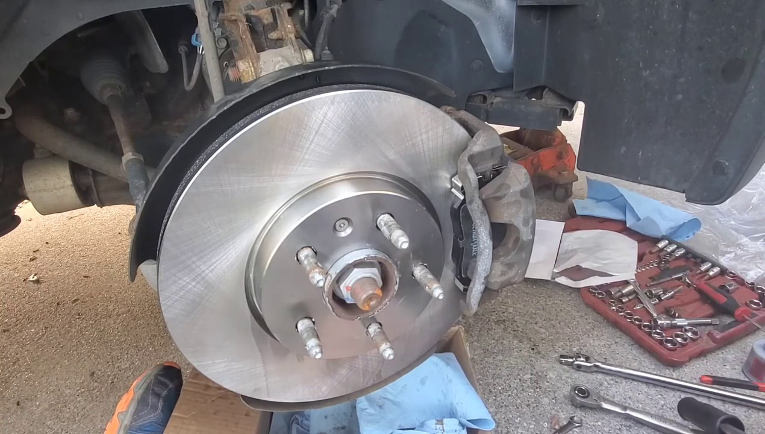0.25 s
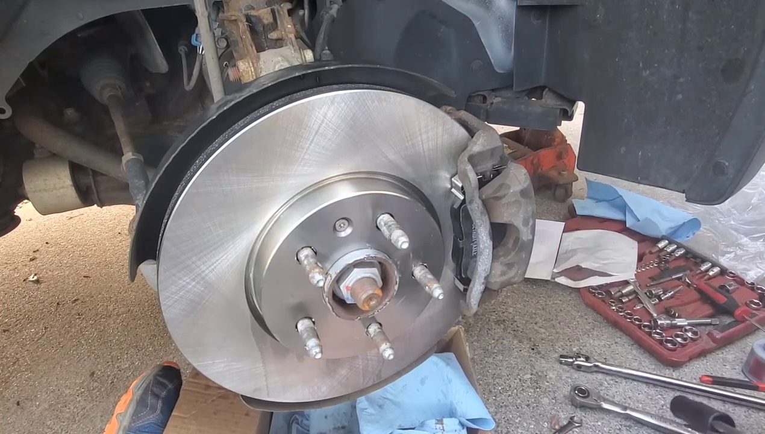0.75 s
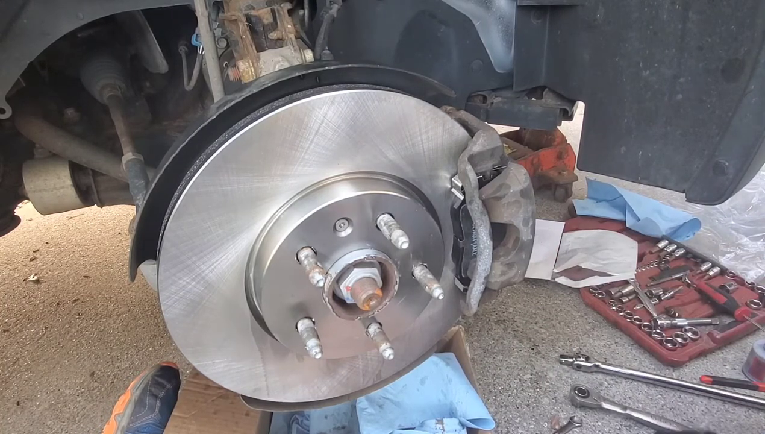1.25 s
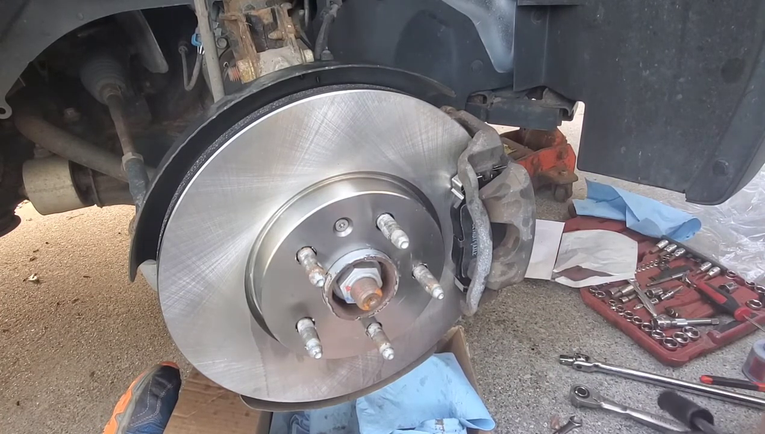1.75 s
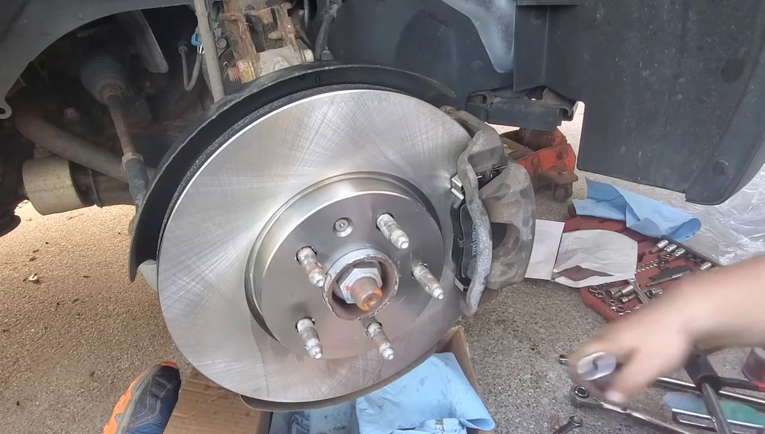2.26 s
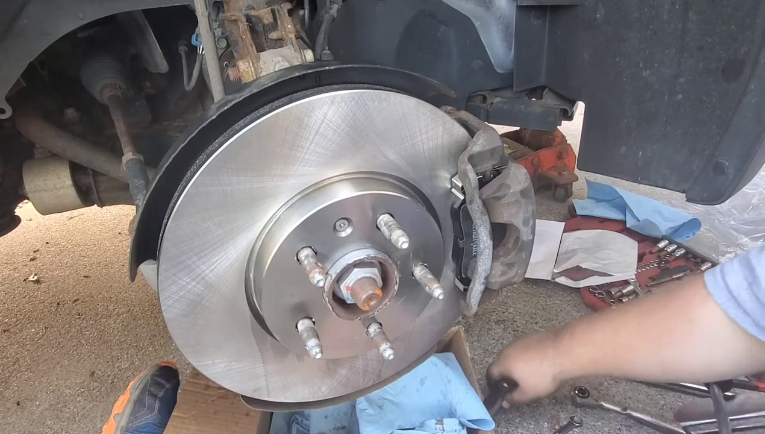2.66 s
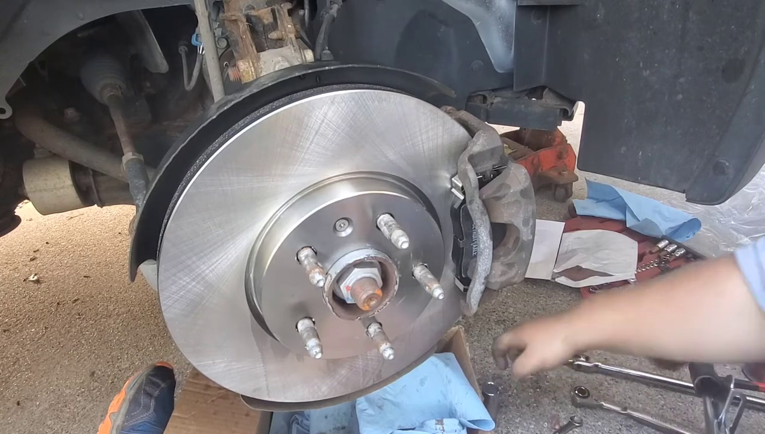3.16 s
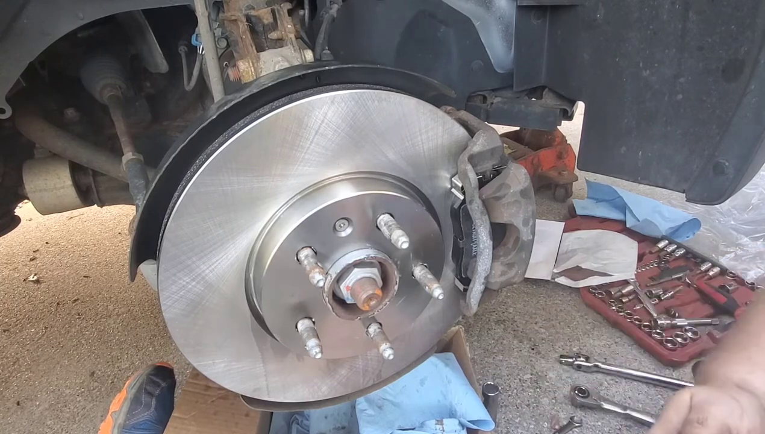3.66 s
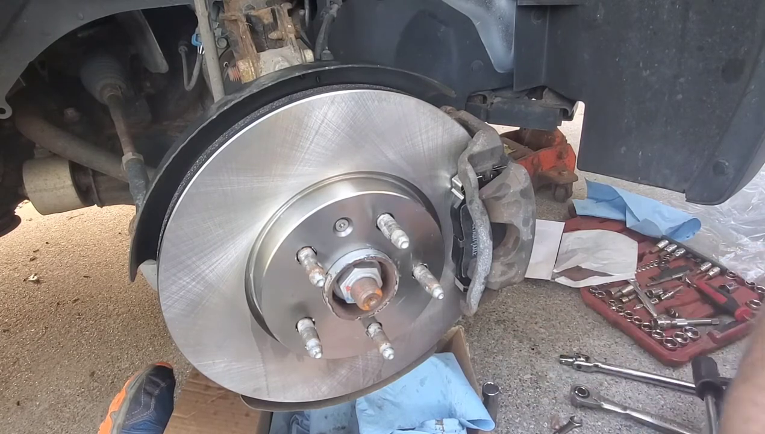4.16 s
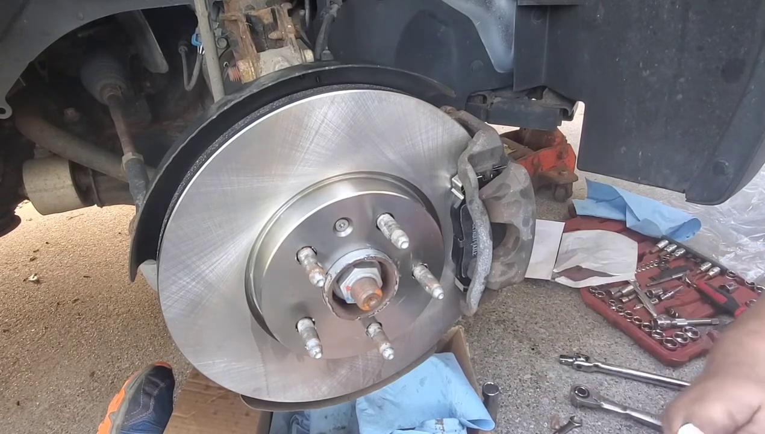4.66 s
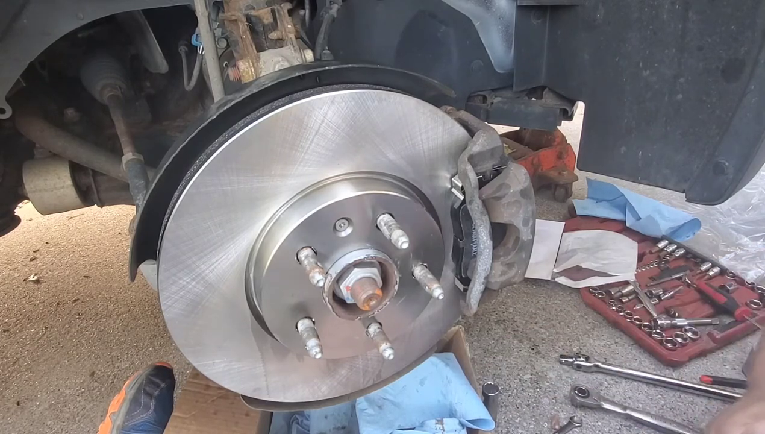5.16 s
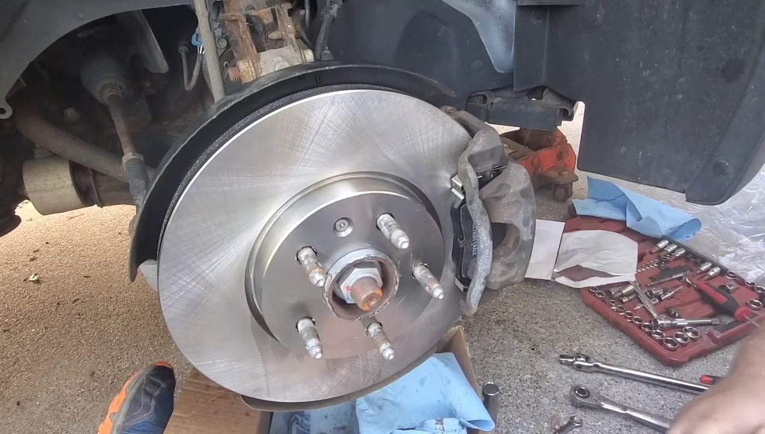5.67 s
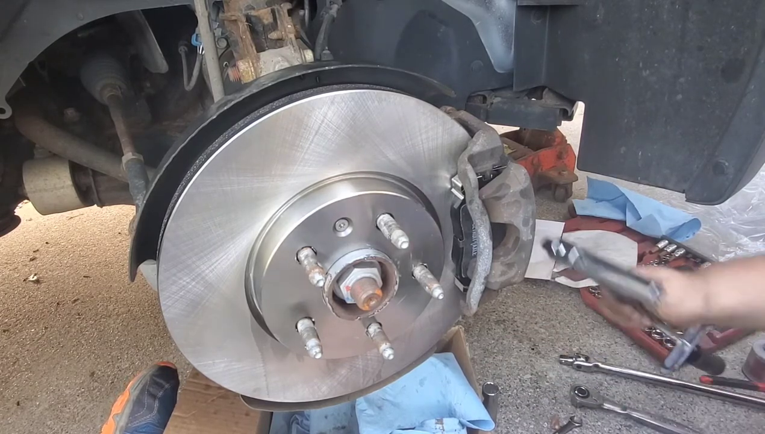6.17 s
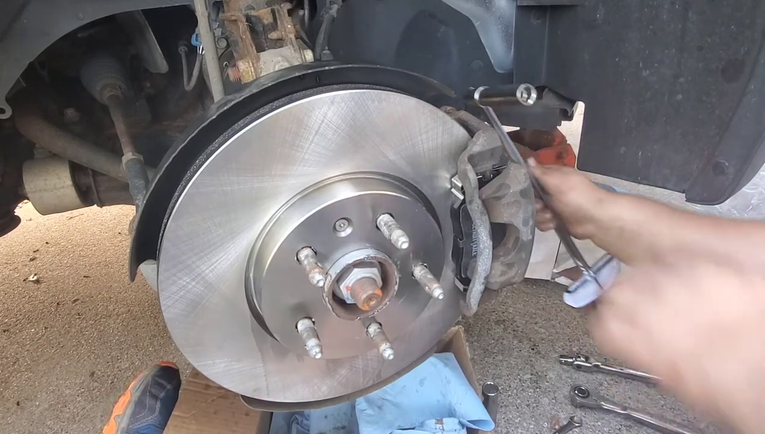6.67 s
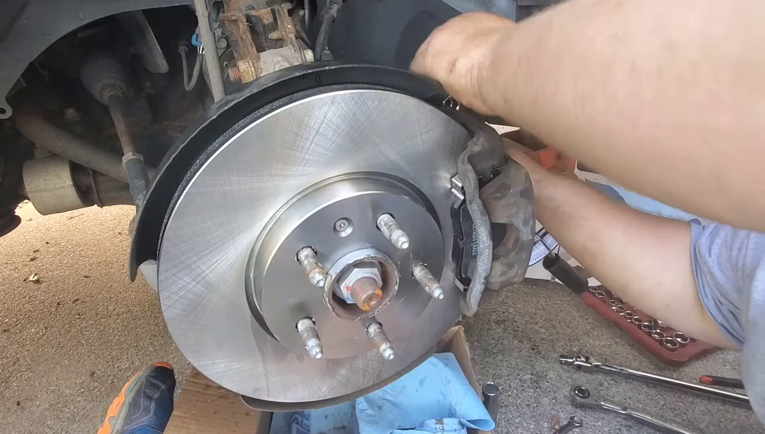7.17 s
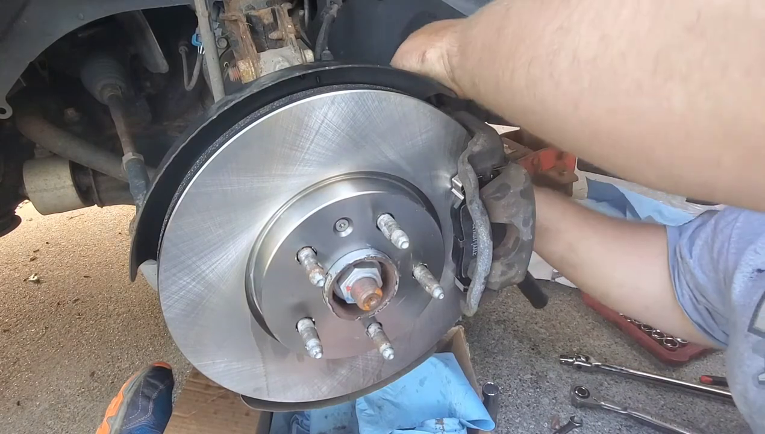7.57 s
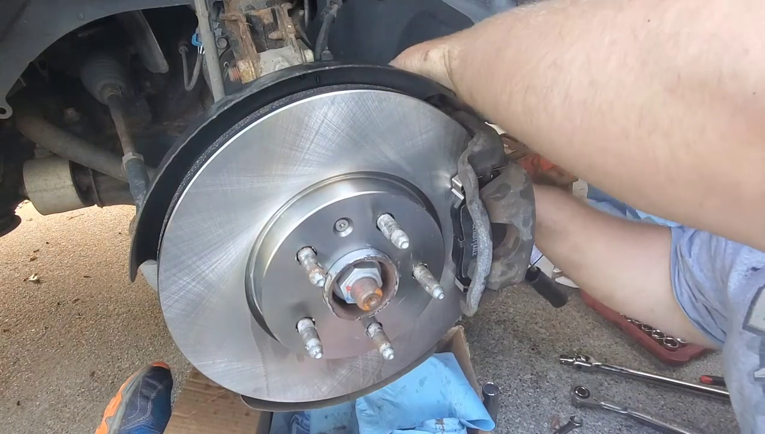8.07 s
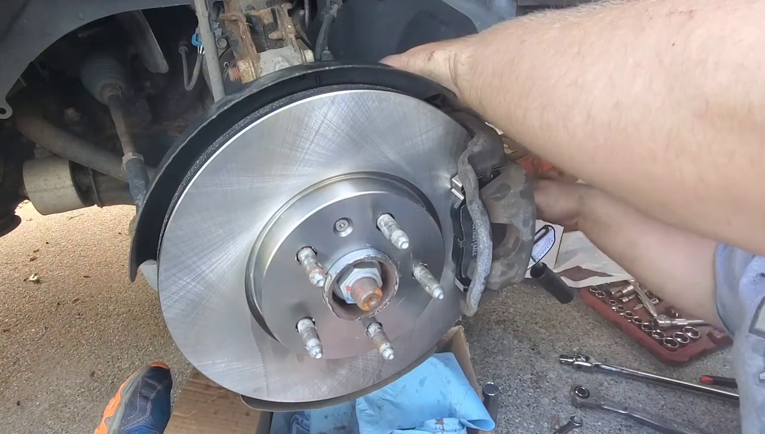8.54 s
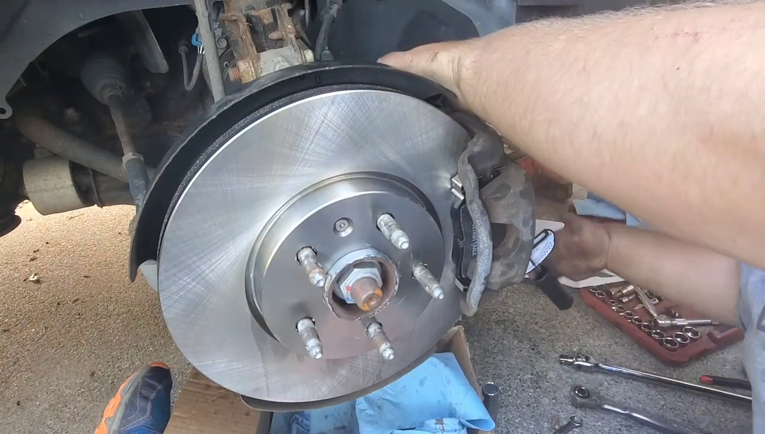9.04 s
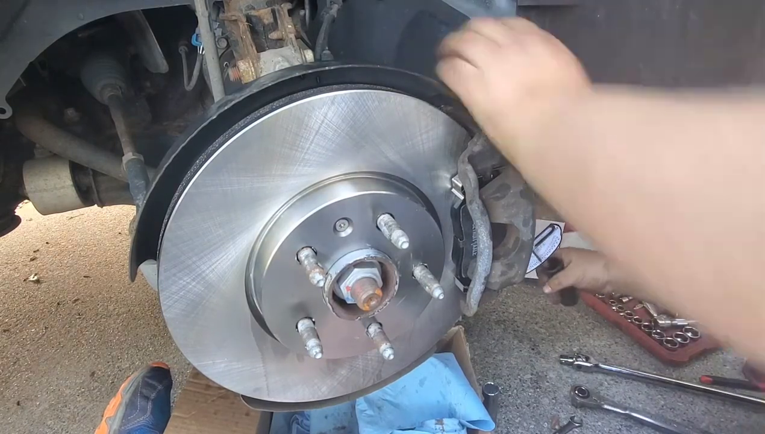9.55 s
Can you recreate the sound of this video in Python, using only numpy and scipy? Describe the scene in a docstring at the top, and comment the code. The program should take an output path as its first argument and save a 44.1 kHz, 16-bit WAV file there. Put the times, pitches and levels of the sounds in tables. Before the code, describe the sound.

Metal hand tools clink and clatter on hard ground outdoors, later tapping and scraping a brake hub, with soft low rumble and faint hiss behind.

```python
"""Sockets and a ratchet on a concrete drive

Steel sockets and a ratchet handle knock and chatter on the ground, then touch and scrape a car's hub.
Each knock is a crack and a short chatter of noise and bounces that ring the tools as decaying sines;
scrapes are gritty noise and taps are the ringing modes of the hub and its shield, all with a short echo.
Behind them shaped noise makes a low rumble, road wash, narrow hums, rustling cloth and air hiss.
Two microphone ports hear the tools a little apart."""
import sys
import numpy as np
from scipy import signal
from scipy.fft import irfft
from scipy.io import wavfile
from scipy.ndimage import uniform_filter1d

SR = 44100
rng = np.random.default_rng(int(sys.argv[2]) if len(sys.argv) > 2 else 0)


def wrap_up_sound(samples):
    """Save the sound to the file named by the first command line argument, as 16-bit audio."""
    columns = np.atleast_2d(samples).T
    # keep every value between -1 and 1, then stretch to whole-number steps
    tamed = np.clip(columns, -1, 1)
    steps = np.round(tamed * 32767).astype(np.int16)
    wavfile.write(sys.argv[1], SR, steps)


N = 432599
FREQ = np.maximum(np.fft.rfftfreq(N, 1 / SR), 1)

TREBLE_END_HZ = 15650
KNOCK_LIKENESS = 0.067  # left-right correlation of the contact noise

# Hub mode frequencies [Hz]
HUB_MODES_HZ = 813, 750, 931, 1217, 1450, 1981, 2126, 2320, 2396, 2487, 2780, 2907, 3391, 3790, 4097, 4603
# How each hub mode rings: level_db [dB, relative], t60_s [s]
HUB_MODES = [(2.5, 0.37), (-7, 0.6), (-0.5, 0.13), (-1.5, 0.12), (-23, 0.33), (-26, 0.25), (-12.5, 0.34),
             (7, 0.15), (-2.5, 0.16), (-7, 0.25), (-9, 0.19), (4.5, 0.14), (-5.5, 0.17), (3, 0.13),
             (-3, 0.037), (-7.5, 0.19)]


def undb(db):
    """Decibels to amplitude gain."""
    return 10 ** (np.asarray(db) / 20)


def along(table, hz=FREQ):
    """Read (Hz, value) points on a log frequency axis."""
    at, value = np.transpose(table)
    return np.interp(np.log(hz), np.log(at), value)


def band(x, lo_hz, hi_hz):
    """Band-pass that keeps white noise at its rms."""
    sos = signal.butter(4, [lo_hz, hi_hz], "bandpass", fs=SR, output="sos")
    return signal.sosfilt(sos, x) * np.sqrt(SR / 2 / (hi_hz - lo_hz))


def walk(rate_hz):
    """Random levels, each held 1 / rate_hz seconds, then smoothed twice over the same length."""
    hold = int(SR / rate_hz)
    steps = np.repeat(rng.standard_normal(N // hold + 1), hold)
    return uniform_filter1d(uniform_filter1d(steps, hold), hold)[:N]


def pair(shape, like):
    """Two noises, left and right, with correlation `like`."""
    left, other = rng.standard_normal((2,) + shape)
    return np.array([left, like * left + np.sqrt(1 - like ** 2) * other])


def knocks():
    """A crack, then chatter: broadband clatter, a ping of the piece itself and blows into each tool."""
    # Every knock: start_s [s]; clatter thud_db, clack_db, chink_db, treble_db [dB, relative];
    # t60_s [s], free_s [s until muffled], pan_db [dB, left minus right],
    # rings {tool: blow_db [dB], ping: (pitch_hz [Hz], level_db [dB])}
    blows = [(0.5142, -67, -53, -55, -66, .11, .08, -1, dict()),
             (0.757, -48, -39.5, -38, -29.5, 0.047, .08, 0.5, dict(ping=(11800, -37.5))),
             (0.9651, -37, -25, -35.5, -36, 0.059, .08, -2, dict(ping=(3050, -40))),
             (1.2848, -24, -17.5, -14.5, -21, 0.17, .12, -1, dict(bar=-37, head=-22, wide=-21, long=-21.5, deep=-23.5, small=-33, ping=(15300, -14))),
             (1.4066, -24.5, -37.5, -49, -50, 0.04, .089, -1.5, dict(ping=(1300, -52))),
             (1.858, -45, -50, -39.5, -46, .23, .074, -1, dict(head=-53, ping=(4060, -39))),
             (1.9, -37, -26, -15, -27, 0.13, 0.13, 6, dict(head=-28.5, wide=-27, long=-40, deep=-33.5)),
             (1.9065, -33, -47, -20, -15.5, 0.096, .11, -4.5, dict(bar=-37.5, head=-29, wide=-27, long=-22.5, deep=-29.5, small=-37)),
             (2.0428, -24, -9, -23, -32, 0.03, 0.04, 0.5, dict(bar=-40, small=-13, extension=-45)),
             (2.3314, -71, -59, -34, -39, 0.095, .08, -6, dict(head=-47, ping=(4600, -48))),
             (2.4074, -55, -42, -56, -54, 0.12, .08, 3, dict(ping=(1530, -41.5))),
             (2.9197, -34, -54, -53, -72, 0.14, 0.053, 2, dict(ping=(500, -43.5))),
             (3.1894, -41.5, -68, -57, -66, 0.087, .08, 4, dict()),
             (3.289, -60, -65, -66, -71, .091, .08, 3, dict()),
             (4.165, -37, -17, -13, -26, 0.11, 0.04, 2, dict(bar=-35.5, head=-18, wide=-18, long=-31, deep=-44, extension=-24)),
             (4.1755, -31.5, -26.5, -28, -25, 0.14, 0.14, -1, dict(bar=-29.5, head=-15.5, wide=-20, long=-23.5, extension=-29)),
             (4.2717, -45, -33, -38.5, -44, 0.16, 0.063, -2.5, dict(bar=-42.5, head=-39, wide=-27, extension=-40.5)),
             (4.8854, -35, -25, -20.5, -38.5, .13, 0.059, 0, dict(bar=-46, head=-36, wide=-22, long=-29.5, deep=-46)),
             (4.9084, -37, -24, -37, -55, 0.044, 0.046, 1.5, dict(head=-55, wide=-26)),
             (4.9452, -40, -27.5, -26, -56, 0.086, 0.015, -3, dict(wide=-21.5, long=-34)),
             (5.007, -34, -32, -25, -50, 0.068, 0.025, -0.5, dict(head=-37, wide=-30, long=-36)),
             (5.0443, -36, -39, -40, -54, 0.09, .08, 0, dict(ping=(4300, -35))),
             (5.0791, -51, -47, -36, -36, 0.061, .08, -3, dict()),
             (5.236, -29, -31, -22, -38, 0.039, 0.024, -2, dict(wide=-30.5)),
             (5.2482, -32, -46, -46, -61, 0.069, .08, 5, dict(ping=(1800, -48))),
             (5.4033, -33, -31, -28, -30, 0.2, 0.067, -13, dict(ping=(15000, -22))),
             (5.4114, -17, -19.5, -17, -18, 0.098, .13, 3, dict(head=-40, ping=(14600, -25))),
             (5.5784, -45, -54, -42, -48, 0.08, 0.055, -2, dict(ping=(4210, -46))),
             (5.7747, -47, -43.5, -43, -38.5, 0.097, .08, 1.5, dict(ping=(11700, -46))),
             (5.8955, -46, -50.5, -44, -49, 0.11, 0.06, 0, dict()),
             (7.0649, -22.5, -13.5, -23, -43.5, 0.11, 0.035, 0, dict(head=-28, wide=-17.5, extension=-50.5, ping=(2440, -21))),
             (7.3953, -34.5, -46, -43, -62, 0.071, .08, 5, dict(ping=(2000, -47))),
             (7.516, -33.5, -26.5, -33, -64, .065, .08, -1, dict(ping=(4400, -50))),
             (7.5764, -59, -59, -44, -46.5, 0.076, .08, 2, dict()),
             (8.225, -58, -71, -49, -45, 0.048, 0.086, 2, dict(ping=(7300, -53))),
             (8.5037, -48, -57, -62, -59, 0.16, .08, -4, dict(ping=(690, -40))),
             (8.6769, -35, -29, -29.5, -25.5, 0.08, 0.053, 0, dict(head=-51, ping=(2300, -36))),
             (9.0086, -43.5, -35.5, -38, -43, 0.082, .086, 1, dict(ping=(2300, -45))),
             (9.0456, -43, -42, -52, -69, .09, .08, -2, dict(ping=(2270, -53))),
             (9.0932, -43, -43, -51, -58, 0.15, .08, -1, dict()),
             (9.1224, -36, -26.5, -41, -64, 0.034, .064, 0, dict(ping=(4500, -39))),
             (9.1925, -41, -43, -51, -64, .075, .08, 0, dict())]
    ping_t60_s = .055
    bounce_rate_hz, patter_decay_s = 400, 0.0059
    fizz_db = 3  # top of the treble clatter against its lower part
    t = np.arange(int(SR / 2)) / SR
    loose = loose_tools()
    clatter = np.zeros((5, 2, N + len(t)))
    ringing = np.zeros((2, N + len(t)))
    for start_s, thud, clack, chink, treble, t60_s, free_s, pan_db, rings in blows:
        at = slice(int(start_s * SR), int(start_s * SR) + len(t))
        pan = undb([[pan_db / 2], [-pan_db / 2]])
        fade = 1000. ** (-t / t60_s)
        # a hand or the ground soon muffles the loose tools
        muffle = 1000. ** (-np.maximum(t - free_s, 0) / 0.023)

        # bounces come every few ms with uneven strength
        bounces = (rng.random(len(t)) < bounce_rate_hz / SR) * rng.standard_normal(len(t))
        patter = signal.lfilter([1], [1, -np.exp(-1 / (patter_decay_s * SR))], np.abs(bounces))
        envelope = (1 - np.exp(-t / 0.00022)) * fade * muffle * (0.32 + 0.13 * patter)
        rattle = envelope * jangle(size=len(t))
        rattle[:, 0] = 1.5  # the crack
        levels = undb([thud, clack, chink, treble, treble + fizz_db])[:, None, None]
        clatter[:, :, at] += levels * pan * rattle

        # the first blow and the weaker bounces drive the tools
        drive = 0.13 * bounces * fade ** 2 * muffle
        drive[0] = 1
        struck = np.zeros((2, len(t)))
        for tool, db in rings.items():
            if tool in loose:
                struck = struck + undb(db) * loose[tool]
        steel = signal.fftconvolve(struck, drive[None])[:, :len(t)]
        if "ping" in rings:
            hz, ping_db = rings["ping"]
            steel = steel + undb(ping_db) * np.sin(2 * np.pi * hz * t) * 1000. ** (-t / ping_t60_s)

        # rocking on the ground roughens the ring
        rocking = undb(44.0 * uniform_filter1d(rng.standard_normal(len(t)), size=300))
        ringing[:, at] += pan * muffle * rocking * steel
    # thud, clack, chink, treble and fizz [Hz]
    edges = [(450, 1600), (1700, 3880), (4000, 7730), (9000, 14200), (12500, TREBLE_END_HZ)]
    crackle = sum(band(layer, lo, hi) for layer, (lo, hi) in zip(clatter, edges))
    return (ringing + undb(-1.0) * crackle)[:, :N]


def loose_tools():
    """Each loose steel piece rings at its own modes when struck."""
    # Mode frequencies of each tool [Hz]
    bar_hz = 969, 1580, 2003, 2890
    head_hz = 4000, 4167
    wide_hz = 4397, 4730, 4900, 5525
    long_hz = 5605, 5680
    deep_hz = 3082, 3648, 6755, 7240, 15300
    small_hz = 13180, 12560
    extension_hz = 14478, 14365
    # How each of those modes rings: level_db [dB, relative], t60_s [s]
    bar_modes = [(6.5, 0.29), (-8, 0.074), (0.5, 0.19), (11.5, 0.11)]
    head_modes = [(3.5, 0.21), (-8, 0.12)]
    wide_modes = [(-6, 0.078), (-9, 0.052), (-15.5, 0.19), (-18, 0.069)]
    long_modes = [(3.5, 0.098), (-5.5, 0.1)]
    deep_modes = [(5, 0.11), (13, 0.058), (0, 0.074), (-3, 0.15), (-5, .06)]
    small_modes = [(1.5, 0.15), (-42, .13)]
    extension_modes = [(21, 0.047), (-9, 0.081)]
    return dict(bar=ring(bar_hz, bar_modes), head=ring(head_hz, head_modes),
                wide=ring(wide_hz, wide_modes), long=ring(long_hz, long_modes),
                deep=ring(deep_hz, deep_modes), small=ring(small_hz, small_modes),
                extension=ring(extension_hz, extension_modes))


def ring(hz, modes, spread=.7, rise_s=.0007):
    """Decaying sines after one blow; every mode reaches the two ports with its own phase."""
    hz = np.array(hz)[:, None]
    db, t60_s = np.transpose(modes)[:, :, None]
    t = np.arange(int(SR / 2)) / SR
    # small path differences turn the high modes more
    turn = spread * np.minimum(hz / 5000, 1) * rng.standard_normal((2, len(hz), 1))
    tones = undb(db) * np.sin(2 * np.pi * hz * t + turn) * 1000. ** (-t / t60_s)
    return tones.sum(1) * (1 - np.exp(-t / rise_s))


def jangle(size, share=.6, spacing_hz=220):
    """Noise mixed with scattered partials, new for every contact: the many small parts that shake along."""
    # share is the partials' part of the power, spacing_hz their mean distance
    lines = rng.random(size // 2 + 1) < SR / size / spacing_hz
    spectrum = pair(lines.shape, KNOCK_LIKENESS) + 1j * pair(lines.shape, KNOCK_LIKENESS)
    tones = irfft(lines * spectrum, size)
    noise = pair((size,), KNOCK_LIKENESS)
    return np.sqrt(share) * tones / tones.std() + np.sqrt(1 - share) * noise


def scrapes():
    """Gritty noise swells, holds and fades, and the same grit keeps the hub ringing."""
    # Steel dragged over a rough face; at 7.082 s the hub rings on after the knock, with faint grit:
    # start_s [s], swell_s [s], hold_s [s], low_grit_db, middle_grit_db, high_grit_db, hub_drive_db [dB, relative]
    contacts = [(2.042, 0.023, 0.01, -29, -59, -45, -70), (7.082, 0.009, 0.028, -50, -66, -64, -38.5),
                (7.193, 0.057, .04, -52, -50.5, -57, -46.5), (7.38, .02, 0.15, -74, -71, -64, -61),
                (8.956, 0.056, .012, -57, -58, -64, -75), (9.21, 0.02, .04, -59.5, -62, -63, -77),
                (9.483, 0.046, 0.066, -42.5, -41.5, -47, -43)]
    # Borders of the three grit bands: edge_hz [Hz]
    grit_edges_hz = 1200, 5000, 10500, 15650
    swell_from_db, fade_db_per_s = -18, 489
    time = np.arange(N) / SR
    gain = np.zeros((4, N))
    for start_s, swell_s, hold_s, *levels_db in contacts:
        swell_db = swell_from_db * np.clip(1 - (time - start_s) / swell_s, 0, 1)
        fade_db = fade_db_per_s * np.maximum(time - start_s - swell_s - hold_s, 0)
        gain += (time >= start_s) * undb(swell_db - fade_db) * undb(levels_db)[:, None]
    grit = jangle(size=N, share=.4, spacing_hz=200) * undb(2.2 * walk(300))
    hub = signal.oaconvolve(gain[3] * grit, ring(HUB_MODES_HZ, HUB_MODES), axes=1)[:, :N]
    rasp = sum(g * band(grit, lo, hi) for g, lo, hi in zip(gain, grit_edges_hz, grit_edges_hz[1:]))
    return rasp + undb(-36.0) * hub


def taps():
    """Blows into the hub and the thin dust shield behind it, which ring on freely."""
    # The tool touches the car: start_s [s], hub_db [dB], shield_db [dB]
    touches = [(7.064, -38.5, -74), (7.259, -58, -79), (7.516, -59, -74), (9.495, -49, -61),
               (9.608, -52, -54)]
    # Dust shield mode frequencies [Hz]
    shield_hz = 829, 1289, 1308, 1456
    # How each shield mode rings: level_db [dB, relative], t60_s [s]
    shield_modes = [(2, .9), (-4, 2.5), (-3, 2.5), (-2, .8)]
    car = np.array([ring(HUB_MODES_HZ, HUB_MODES), ring(shield_hz, shield_modes)])
    length = car.shape[2]
    out = np.zeros((2, N + length))
    for start_s, *blow_db in touches:
        start = int(start_s * SR)
        out[:, start:start + length] += np.tensordot(undb(blow_db), car, axes=1)
    return out[:, :N]


def echo(x):
    """Wheel arch, underbody and ground return a short dense noise tail, different on each port."""
    level_db, t60_s, top_hz = -18.5, 0.21, 6240
    t = np.arange(int(SR / 2)) / SR
    tail = rng.standard_normal((2, len(t))) * 1000. ** (-t / t60_s) * (t > .002)
    tail = signal.sosfilt(signal.butter(1, top_hz, fs=SR, output="sos"), tail)
    tail *= undb(level_db) / np.sqrt(np.sum(tail ** 2, axis=1, keepdims=True))
    return signal.oaconvolve(x, tail, axes=1)[:, :N]


def yard():
    """Low rumble and road wash rise and fall, hiss swells over the air hiss, narrow hums waver."""
    # Low rumble: traffic, with a wind or handling thump at 5.19 s; and road wash:
    # time_s [s], low_rumble_db [dB], road_wash_db [dB]
    background = [(0.0, -48, -57), (0.87, -46.5, -57), (2.16, -47.5, -56), (3.47, -41, -56.5),
                  (3.82, -48.5, -57), (4.78, -43, -57.5), (5.03, -51, -58), (5.19, -36.5, -55.5),
                  (5.49, -50, -58), (5.65, -42, -59.5), (6.12, -46.5, -59), (7.02, -47, -58.5),
                  (7.32, -45, -54), (7.73, -49, -58.5), (8.52, -47.5, -58), (9.81, -43, -56)]
    # Cloth moves; at 5.434 s a short hiss tail after the hard knock: middle_s [s], length_s [s], level_db [dB]
    hiss_swells = [(1.39, 0.23, -58), (2.21, 0.56, -59.5), (2.937, 0.51, -65.5), (3.677, 0.43, -63.5),
                   (4.288, 0.44, -65.5), (5.434, .15, -53), (6.64, 0.24, -61.5), (7.314, 0.45, -56.5),
                   (8.447, 0.15, -70), (9.2, 0.27, -70)]
    # Noise colours of low rumble, road wash, and air hiss with its swells:
    # frequency_hz [Hz], density_db [dB per Hz, relative]
    rumble_colour = [(11, -48), (18, -14), (48, 2.5), (60, 1), (76, 3.5), (109, -1.5), (141, -7),
                     (200, -18), (260, -26.5), (440, -120)]
    road_colour = [(120, -46), (200, -3.5), (227, -9), (276, -8.5), (323, -12.5), (555, -14), (1020, -13.5),
                   (1500, -24.5), (1950, -73), (3300, -120)]
    hiss_colour = [(880, -34), (1500, -3.5), (1950, -3.5), (2220, -3), (2700, -3.5), (3700, -5.5),
                   (4970, -5), (6160, -5.5), (8030, -4), (9870, -14.5), (14900, -6), (15600, -19)]
    # A distant motor's hum: pitch_hz [Hz], width_hz [Hz], level_db [dB]
    motor_hum = [(73.6, 22.6, -52), (114.4, 10, -54.5)]
    # Levels of a narrow, wavering 200 Hz hum: time_s [s], level_db [dB]
    high_hum_levels = [(0.0, -58), (0.82, -77), (1.45, -69), (1.48, -64), (2.79, -77), (4.94, -78.5),
                       (5.16, -66), (5.25, -79), (6.56, -57), (6.72, -77), (7.49, -53.5), (7.54, -60.5),
                       (9.75, -57), (9.81, -76)]
    high_hum_hz, high_hum_width_hz = 199.6, 5.7
    air_db = -63.5
    time = np.arange(N) / SR
    time_s, rumble_db, road_db = np.transpose(background)
    swell_power = sum(undb(db) ** 2 * np.exp(-(2 * (time - middle_s) / length_s) ** 4)
                      for middle_s, length_s, db in hiss_swells)
    rumble_level = undb(np.interp(time, time_s, rumble_db))
    road_level = undb(np.interp(time, time_s, road_db))
    hiss_level = np.sqrt(undb(air_db) ** 2 + swell_power)
    # the last number scales a random level flicker in dB
    layers = [(rumble_colour, rumble_level, 2.5), (road_colour, road_level, 1.2), (hiss_colour, hiss_level, .6)]
    out = 0
    for colour, level, flicker_db in layers:
        inside = (FREQ >= colour[0][0]) & (FREQ <= colour[-1][0])
        out = out + level * undb(flicker_db * walk(8.8)) * wash(inside * undb(along(colour)))
    for hz, width_hz, db in motor_hum:
        out = out + undb(db) * wash(peak(hz, width_hz))
    high_hum_level = undb(np.interp(time, *np.transpose(high_hum_levels)))
    return out + high_hum_level * wash(peak(high_hum_hz, high_hum_width_hz))


def wash(gain):
    """Steady noise of a given colour at unit rms, its likeness on the two ports set by frequency."""
    # How alike the ports hear it: frequency_hz [Hz], correlation [-1 to 1]
    likeness = [(25, .1), (60, .4), (130, .7), (290, .2), (640, -.3), (1410, -.4), (3100, 0)]
    # Balance of the ports: frequency_hz [Hz], left_minus_right_db [dB]
    tilt = [(60, 4.5), (110, 0.5), (200, -1), (380, -2.5), (700, 0.5), (1290, 0.5), (2380, 0.0),
            (4400, -1.5), (8120, 1.5), (15000, -2)]
    like = along(likeness)
    spectrum = pair(FREQ.shape, like) + 1j * pair(FREQ.shape, like)
    side = undb(np.array([[.5], [-.5]]) * along(tilt))
    x = irfft(spectrum * side * gain, N)
    return x / np.sqrt(np.mean(x.mean(0) ** 2))  # rms of the ports' mean


def peak(hz, width_hz):
    """A narrow resonance curve; noise through it hums and wavers."""
    return 1 / (1 + (2 * (FREQ - hz) / width_hz) ** 2)


def scene():
    """The loose tools lie to the right, so the left port hears them later; hub taps come from straight ahead."""
    port_lag = 18  # samples
    tools = knocks() + scrapes()
    tools[0] = np.roll(tools[0], port_lag)
    steel = tools + taps()
    return steel + echo(steel) + yard()


def record(dry):
    """The loudest peaks are rounded, a steep low-pass dulls the treble and a second one closes the top."""
    top_hz = 16800
    rounded = 1.3 * np.tanh(dry / 1.3)
    dulled = signal.sosfilt(signal.ellip(4, .5, 20, TREBLE_END_HZ, fs=SR, output="sos"), rounded)
    return signal.sosfilt(signal.ellip(10, .2, 90, top_hz, fs=SR, output="sos"), dulled)


dry = scene()
out = record(dry)
wrap_up_sound(out)
```